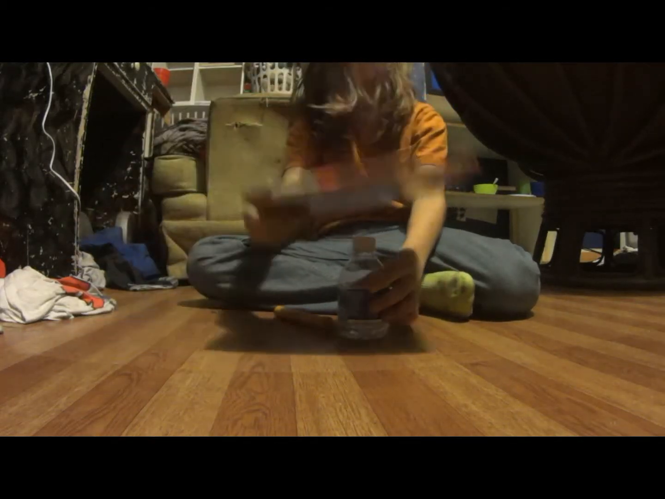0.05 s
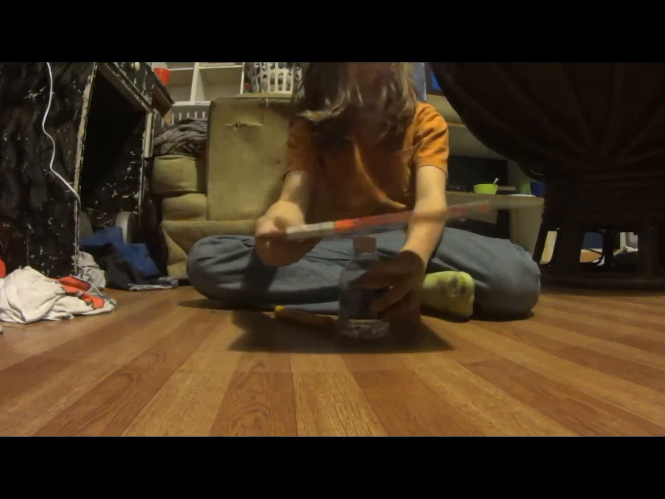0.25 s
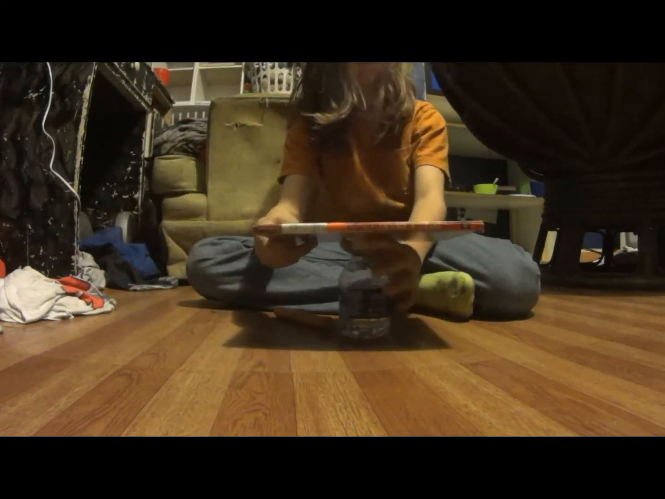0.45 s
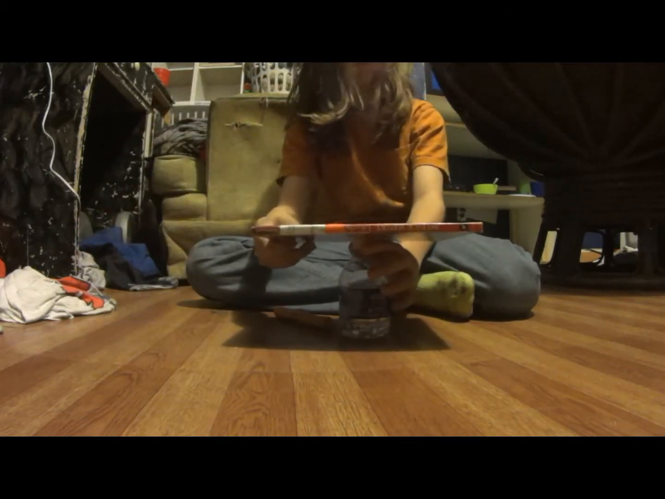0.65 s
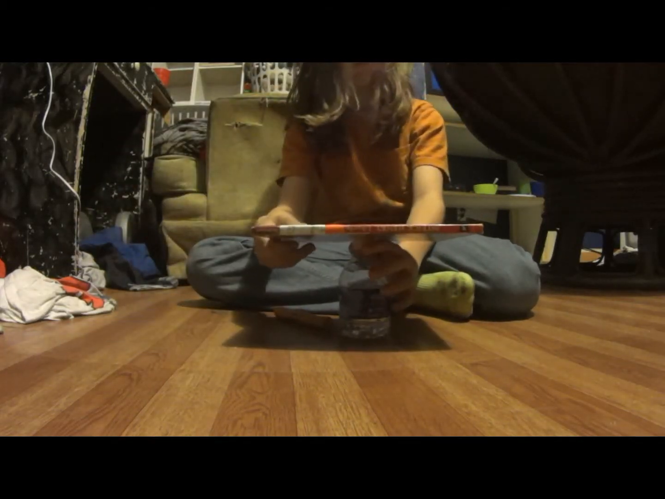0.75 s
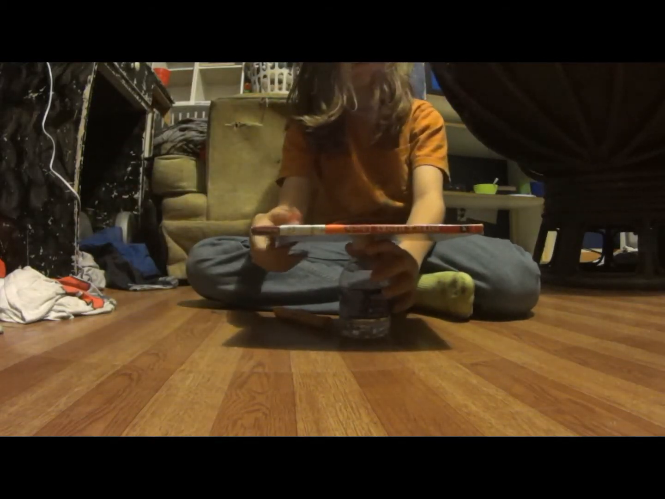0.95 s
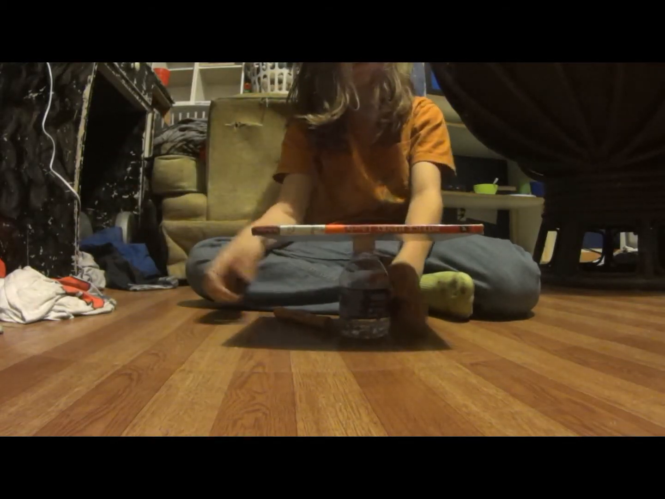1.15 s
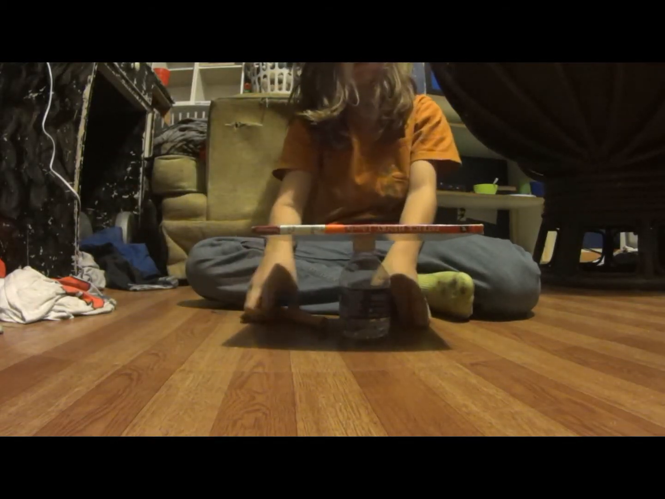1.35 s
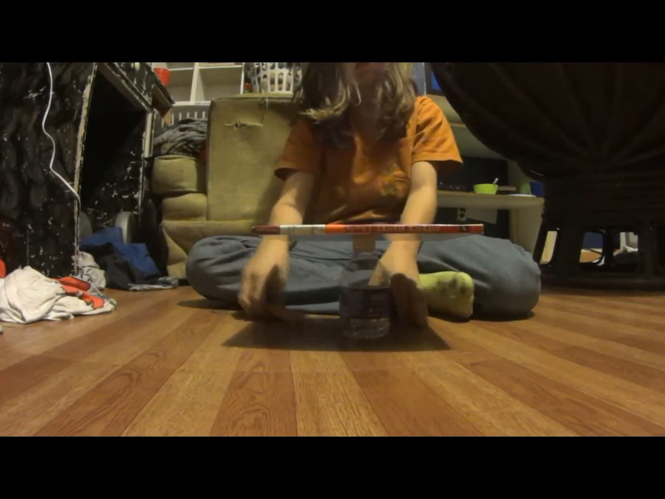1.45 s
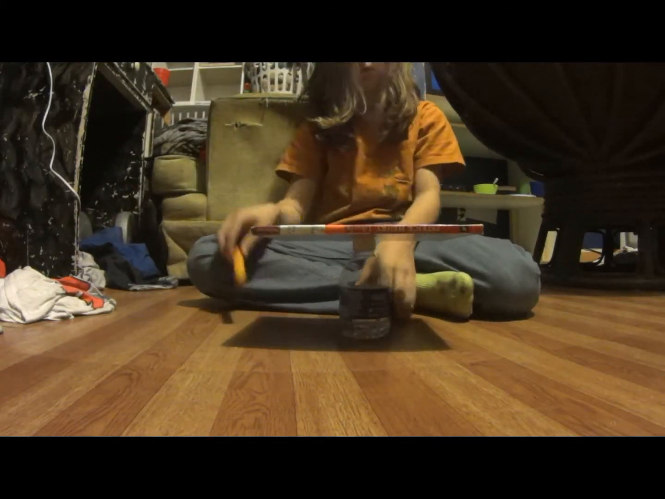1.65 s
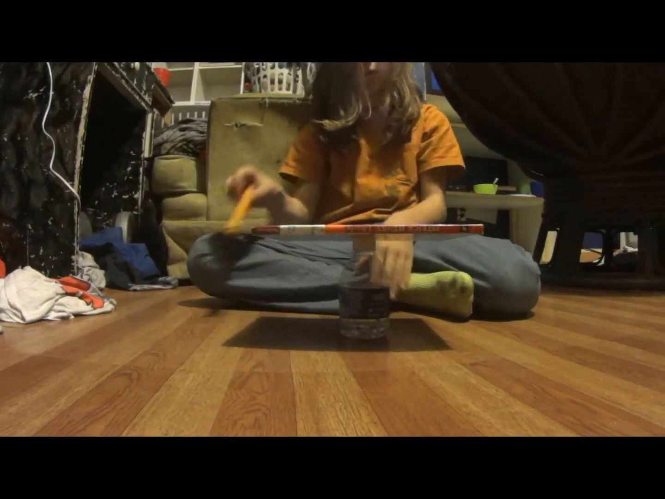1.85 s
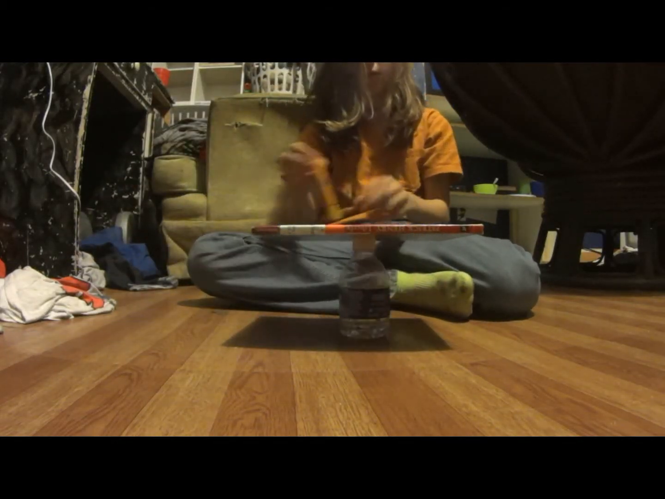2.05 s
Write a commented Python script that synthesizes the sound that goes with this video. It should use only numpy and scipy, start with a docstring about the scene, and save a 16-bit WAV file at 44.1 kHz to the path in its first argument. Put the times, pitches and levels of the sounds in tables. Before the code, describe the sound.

A flat board knocks sharply onto a small plastic bottle at about 0.25 seconds, just after a soft clothing rustle. It knocks again near 0.4 seconds and rocks to rest in softer taps by 0.55. From 1.1 to 1.7 seconds a hand slides off with a faint hiss, two tiny squeaks and sleeve rustle. The sound is close, in a quiet room with a low hum.

```python
"""A quiet, furnished room, a stereo microphone close to a small plastic bottle.
Clothes rustle as an arm swings in. At 0.24 s a flat board lands on the bottle with a sharp knock:
the board rings, the plastic cracks. It drops again and rocks to rest in softer taps by 0.55 s.
From 1.1 s a hand slides off with a faint hiss and two squeaks of skin, and the sleeve rustles
as the arm draws back, leaving the air and low hum of the room."""
import sys
import numpy as np
from scipy import signal
from scipy.fft import rfft, irfft, next_fast_len
from scipy.io import wavfile

SR = 44100
rng = np.random.default_rng(int(sys.argv[2]) if len(sys.argv) > 2 else 0)


def wav_record(signal):
    """Record a signal, one row per channel, as 16-bit PCM in the file named by sys.argv[1]."""
    frames = np.transpose(np.atleast_2d(signal))
    bounded = np.clip(frames, -1, 1)
    # unit amplitude maps onto the largest positive 16-bit level
    quanta = np.round(bounded * 32767).astype(np.int16)
    wavfile.write(sys.argv[1], SR, quanta)


N = 92610

# Board meeting bottle, close to the microphone; the spot struck stresses one pitch of the clack:
# (time [s], level [dB], hardness [Hz], crack gain [dB], crack top [Hz], clack pitch [Hz],
#  clack gain [dB], board ring gain [dB], room send [dB])
CONTACT_HITS = [(0.2388, 15, 2440, -7, 8450, 860, 1.5, -1.5, 2),
                (0.2395, 2, 3060, -19, 4470, 3290, 10.5, -9, -5),
                (0.2413, 9, 1510, -39, 5000, 1490, -9, -2, -4),
                (0.2463, -3, 1440, -11, 4000, 424, -22, -4, -2),
                (0.3480, -15.5, 2130, -12, 9000, 1890, 2, -1, -2),
                (0.3773, -8.5, 1520, -4.5, 9000, 1300, -11, 2, 1),
                (0.3821, 12.5, 1850, -10, 6900, 1300, -1, 1, -8.5),
                (0.3858, 9, 1940, -11, 6600, 1360, 15, 0.5, -4.5),
                (0.3870, 7.5, 1800, -18, 5000, 824, 14, 5, 3),
                (0.3915, -1, 1150, -6.5, 9000, 592, 18, -24, 11),
                (0.4361, 11.5, 1980, -18, 4430, 2130, -1.5, -5.5, -14),
                (0.4403, 9, 1440, -14.5, 4600, 900, -20, -10, 0),
                (0.4699, 9, 1550, -34, 3000, 1720, -1.5, -10.5, -0.5),
                (0.4948, -7, 1760, -5.5, 10600, 1756, 11.5, -9, 0.5),
                (0.5295, 9, 1160, -47, 4000, 950, -14, -15, -9),
                (0.5314, -3, 1180, -33, 4000, 1550, 7.5, -18, 3)]
def landing():
    """The board lands and rocks; each contact arrives directly and through the room."""
    knocks = np.array([knock(*contact[:-1]) for contact in CONTACT_HITS])
    room_sends = from_db([contact[-1] for contact in CONTACT_HITS])
    return near_field(knocks.sum(axis=0)) + room(room_sends @ knocks)


# Modes of the board resting on the bottle: (frequency [Hz], gain [dB])
BOARD_MODES = [(150, -9), (181, 4.5), (217, 8.5), (262, -3), (392, -3.5), (446, -11.5), (477, 2.5),
               (569, 11), (751, 1.5), (886, -1), (1046, -10), (1194, -19), (1418, 8), (1582, 1), (1803, -9),
               (1989, -28)]
BOARD_T60_S, BOARD_T60_AT_HZ, DAMPING_SLOPE = .21, 200, .45
PUSH_DB, PUSH_LOW_HZ, CLACK_T60_S = -1, 420, .02
THUD_DB, THUD_BAND_HZ = -26, [55, 110]
def knock(s, db, hard_hz, crack_db, top_hz, clack_hz, clack_db, ring_db):
    """One contact: a rounded push rings the board, with a clack, a floor thud and a crack of plastic."""
    click = impulse(s, db)
    force = cut(click, hard_hz, "low", order=4)
    push = from_db(PUSH_DB) * cut(force, PUSH_LOW_HZ, "high", order=1)
    clack = from_db(clack_db) * resonate(cut(click, 2 * clack_hz, "low"), clack_hz, CLACK_T60_S)
    thud = from_db(THUD_DB) * cut(force, THUD_BAND_HZ, "band")
    t60s = [BOARD_T60_S * (BOARD_T60_AT_HZ / hz) ** DAMPING_SLOPE for hz, _ in BOARD_MODES]
    board = from_db(ring_db) * ring(force, BOARD_MODES, t60s)
    return push + clack + thud + board + from_db(crack_db) * crack(click, top_hz)


# High modes of the plastic bottle: (frequency [Hz], gain [dB])
BOTTLE_MODES = [(2470, -4), (3270, 1.5), (3760, 2.5), (4060, 0), (5450, -15.5), (6250, -8), (7350, 0),
                (8600, -13.5)]
BOTTLE_T60_S, SNAP_DB, SNAP_LOW_HZ = .016, -10, 2600
CRUNCH_DB, CRUNCH_T60_S = -5.5, .0057
def crack(click, top_hz):
    """The plastic snaps and crunches for a moment, which rings its high modes."""
    t = np.arange(SR // 20) / SR
    crunch = rng.standard_normal(len(t)) * np.exp(-np.log(1000) * t / CRUNCH_T60_S)
    crunch /= np.linalg.norm(crunch)
    snap = click + from_db(CRUNCH_DB) * signal.fftconvolve(click, crunch)[:N]
    snap = cut(cut(snap, SNAP_LOW_HZ, "high", order=1), top_hz, "low")
    return from_db(SNAP_DB) * snap + ring(snap, BOTTLE_MODES, [BOTTLE_T60_S] * len(BOTTLE_MODES))


def ring(force, modes, t60s, scatter_db=2.5):
    """Every mode answers each contact with a slightly different strength."""
    offsets = scatter_db * rng.standard_normal(len(modes))
    return sum(from_db(db + offset) * resonate(force, hz, t60)
               for (hz, db), t60, offset in zip(modes, t60s, offsets))


# Reflections off nearby surfaces: (delay [s], gain [dB])
REFLECTIONS = [(.0024, -16.5), (.0041, -14.5), (.0067, -19), (0.0144, -20.5), (.0172, -18.5),
               (.0235, -26.5), (.0272, -25.5)]
# The knocks across the microphone pair: (frequency [Hz], lead of the left side [rad])
LEFT_PHASE_LEAD = [(60, 0.19), (200, 0.75), (430, 1.02), (1120, 1.8), (3270, 1.64), (4900, 0.49),
                   (9000, 0.81), (11500, 0.16)]
def near_field(x):
    """Direct sound and near reflections, reaching the left microphone first."""
    size = next_fast_len(2 * N)
    hz = np.arange(size // 2 + 1) * SR / size
    echoes = sum(from_db(db) * np.exp(-2j * np.pi * hz * s) for s, db in REFLECTIONS)
    left = rfft(x, size) * (1 + echoes)
    right = left * np.exp(-1j * at_hz(LEFT_PHASE_LEAD, hz))
    return irfft([left, right], size)[:, :N]


# Reverberation of the furnished room: (frequency [Hz], band gain [dB])
REVERB_COLOUR = [(60, -24), (130, -14.5), (220, -10.5), (330, -8), (600, -8), (1400, -11.5), (2500, -12.5),
                 (4200, -4.5), (7000, -18), (11000, -20.5)]
# How long it lingers: (frequency [Hz], time to fall by 60 dB [s])
REVERB_T60 = [(100, 0.203), (500, 0.12), (1500, 0.19), (4000, 0.15), (11000, 0.31)]
REVERB_DELAY_S, REVERB_BUILD_S = .0037, .0071
def room(x):
    """A short reverberation builds up and dies band by band."""
    t = np.arange(SR // 2) / SR
    build = np.clip((t - REVERB_DELAY_S) / REVERB_BUILD_S, 0, 1)
    response = 0
    for hz, band in diffuse_bands(len(t)):
        decay = build * np.exp(-np.log(1000) * t / at_hz(REVERB_T60, hz))
        response += from_db(at_hz(REVERB_COLOUR, hz)) * band * decay / np.linalg.norm(decay)
    return signal.fftconvolve(x[None], response, axes=1)[:, :N]


# Clothes on the moving arm: (peak time [s], rise [s], fall [s], level [dB], centre [Hz])
CLOTH_SWISHES = [(0.059, .09, 0.056, -46.5, 1204), (.075, 0.097, 0.067, -52, 620),
                 (1.38, 0.069, .15, -68, 483), (1.428, .004, .01, -59.5, 2500),
                 (1.493, 0.0035, 0.0069, -54, 424), (1.61, 0.021, 0.016, -56.5, 2030),
                 (1.681, 0.017, 0.029, -56, 1430), (1.9, 0.056, .15, -83, 604)]
CLOTH_BAND_RATIO, CLOTH_ROUGH_DB, CLOTH_GRAIN_HZ = 1.576, 1.5, 85
def cloth():
    """Fabric rubs in soft, slightly grainy swishes."""
    grain = from_db(CLOTH_ROUGH_DB * rms_one(cut(rng.standard_normal(N), CLOTH_GRAIN_HZ, "low")))
    rub = grain * sum(band for _, band in diffuse_bands(N))
    rustle = 0
    for s, rise, fall, db, hz in CLOTH_SWISHES:
        swish = rms_one(cut(rub, [hz / CLOTH_BAND_RATIO, hz * CLOTH_BAND_RATIO], "band"))
        rustle += from_db(db) * swell(s, rise, fall) * swish
    return rustle


# Friction hiss of the hand, faint at the microphone: (time [s], level [dB])
HISS_LEVEL = [(0, -62), (.2, -65), (1.09, -74), (1.15, -60.5), (1.3, -57.5), (1.45, -57), (1.54, -58.5),
              (1.66, -53.5), (1.74, -65), (1.88, -60), (2.1, -71)]
# Its spectrum: (frequency [Hz], relative density [dB])
HISS_COLOUR = [(100, 0.5), (1500, 0.5), (4000, -7.5), (7000, -4.5), (10000, -4)]
# The skin catching: (peak time [s], rise [s], fall [s], level [dB])
SKIN_SQUEAKS = [(1.428, .004, 0.021, -52.5), (1.478, 0.0076, 0.012, -55.5)]
# A tiny tick as the hand comes away: (time [s], level before filtering [dB])
RELEASE_TICKS = [(1.642, -28)]
SQUEAK_HZ, SQUEAK_T60_S, TICK_LOW_HZ = 5980, .002, 4970
def sliding_hand():
    """Skin hisses as it slides, whistles softly where it catches and lets go with a tick."""
    hiss = from_db(np.interp(np.arange(N) / SR, *np.transpose(HISS_LEVEL))) * noise(HISS_COLOUR)
    whistle = resonate(noise(HISS_COLOUR), SQUEAK_HZ, SQUEAK_T60_S)
    whistle = rms_one(resonate(whistle, SQUEAK_HZ, SQUEAK_T60_S))
    catches = sum(from_db(db) * swell(s, rise, fall) for s, rise, fall, db in SKIN_SQUEAKS)
    tick = cut(sum(impulse(s, db) for s, db in RELEASE_TICKS), TICK_LOW_HZ, "high")
    return hiss + whistle * catches + tick


# Air of the room, all around the microphone: (frequency [Hz], relative density [dB])
AIR_COLOUR = [(25, -16.5), (60, -11.5), (110, -8.5), (170, -7), (250, -15.5), (450, -14), (900, -16.5),
              (2000, -20), (5000, -25), (11000, -31)]
# Hum, the same on both sides: (frequency [Hz], rms level [dB])
HUM_TONES = [(68, -70.5), (108, -71.5), (150, -70.5)]
AIR_DB = -58
def room_tone():
    """Steady air noise and a low hum."""
    t = np.arange(N) / SR
    hum = sum(from_db(db) * np.sqrt(2) * np.sin(2 * np.pi * (hz * t + rng.random()))
              for hz, db in HUM_TONES)
    return from_db(AIR_DB) * noise(AIR_COLOUR) + hum


# Diffuse sound at the microphone pair: (frequency [Hz], left-right correlation [-1 to 1])
STEREO_CORRELATION = [(60, 0.53), (130, 0.63), (270, 0.28), (570, -0.33), (1200, -0.48), (2540, -0.38),
                      (5370, 0.26), (11400, 0.72)]
def diffuse_bands(size):
    """Sound from all sides: yields the centre frequency and stereo noise of each half octave."""
    edges = 22 * 2 ** np.arange(0, 10, .5)
    white = rng.standard_normal((2, 2, size + SR // 4))
    for k, (low, high) in enumerate(zip(edges, edges[1:])):
        mid, side = cut(white[k % 2], [low, high], "band")[:, -size:]  # neighbours are independent
        hz = np.sqrt(low * high)
        alike = at_hz(STEREO_CORRELATION, hz)
        yield hz, (np.sqrt(1 + alike) * mid + np.sqrt(1 - alike) * side * [[1], [-1]]) / np.sqrt(2)


def noise(colour):
    """Diffuse noise of a given spectrum, unit power."""
    return rms_one(sum(from_db(at_hz(colour, hz)) * band for hz, band in diffuse_bands(N)))


def impulse(s, db):
    """A single click."""
    click = np.zeros(N)
    click[int(s * SR)] = -from_db(db)
    return click


def swell(s, rise, fall):
    """A smooth bump peaking at time s."""
    t = np.arange(N) / SR - s
    return np.exp(-.5 * (t / np.where(t < 0, rise, fall)) ** 2)


def resonate(x, hz, t60):
    """A resonance with gain 1 at its top."""
    radius = np.exp(-np.log(1000) / (t60 * SR))
    feedback = [1, -2 * radius * np.cos(2 * np.pi * hz / SR), radius ** 2]
    return signal.lfilter(np.array([1, 0, -1]) * (1 - radius ** 2) / 2, feedback, x + 1e-18)


def cut(x, hz, kind, order=2):
    """Butterworth filter."""
    return signal.sosfilt(signal.butter(order, hz, kind, fs=SR, output="sos"), x + 1e-18)


def at_hz(points, hz):
    """Read a table on a log-frequency axis."""
    frequencies, values = np.transpose(points)
    return np.interp(np.log(np.maximum(hz, 1)), np.log(frequencies), values)


def from_db(db):
    """Decibels to gain."""
    return 10 ** (np.asarray(db) / 20)


def rms_one(x):
    """Scale to unit power."""
    return x / np.sqrt(np.mean(x ** 2) + 1e-20)


def scene():
    """The landing up front, the small sounds of the person and the room behind it."""
    return landing() + cloth() + sliding_hand() + room_tone()


CUTOFF_HZ = 11050
def record(dry):
    """The microphone signal, its top cut steeply."""
    return signal.sosfiltfilt(signal.ellip(10, .1, 50, CUTOFF_HZ, fs=SR, output="sos"), dry)


dry = scene()
out = record(dry)
wav_record(out)
```